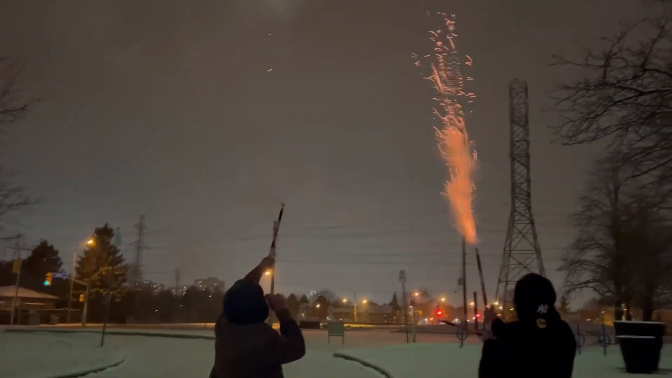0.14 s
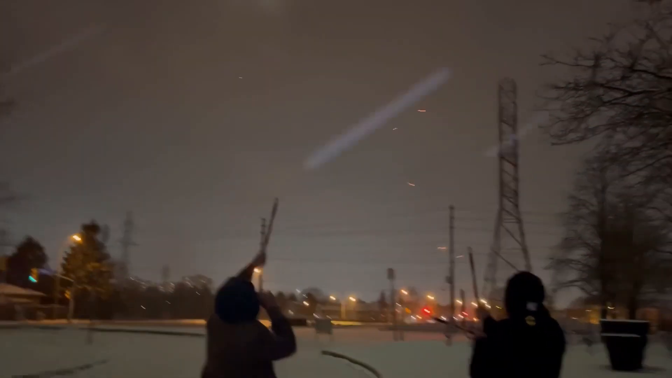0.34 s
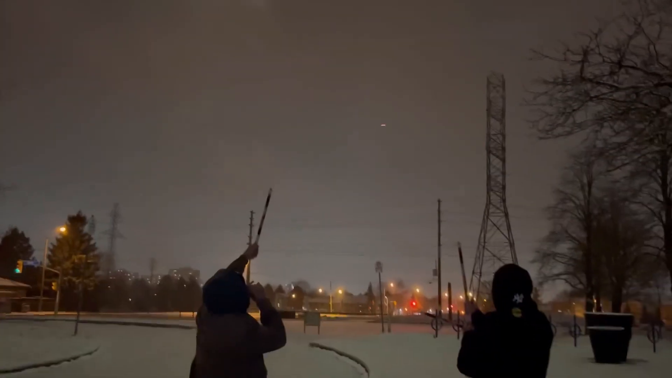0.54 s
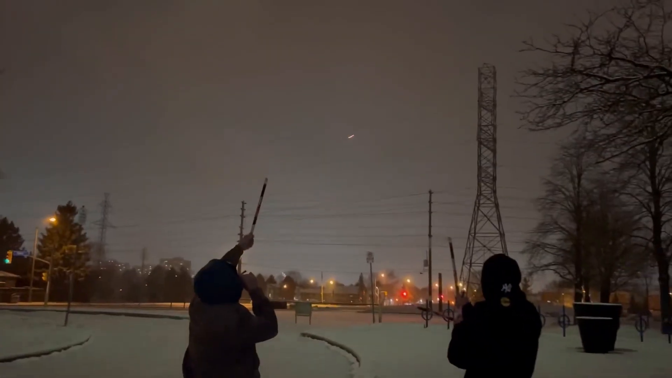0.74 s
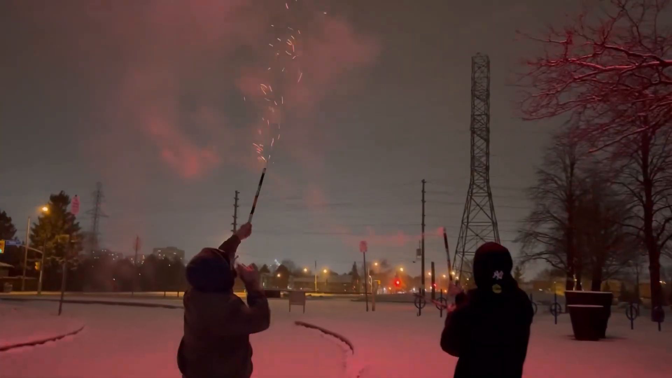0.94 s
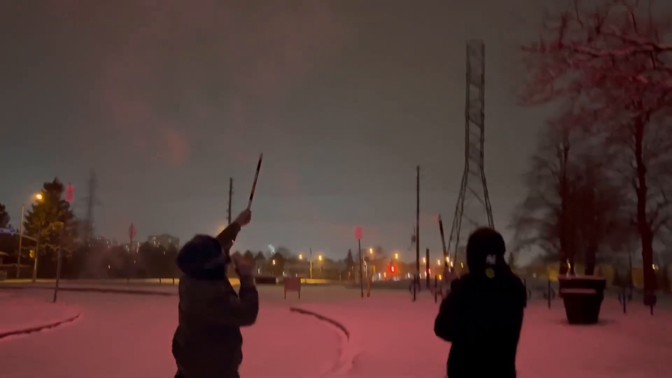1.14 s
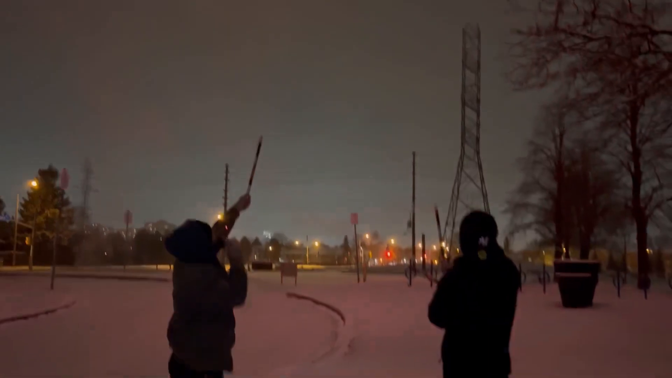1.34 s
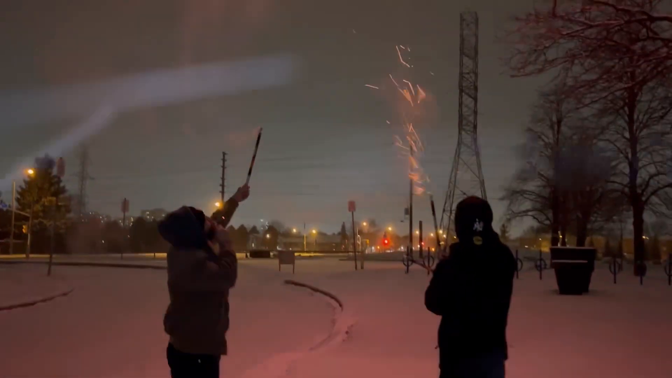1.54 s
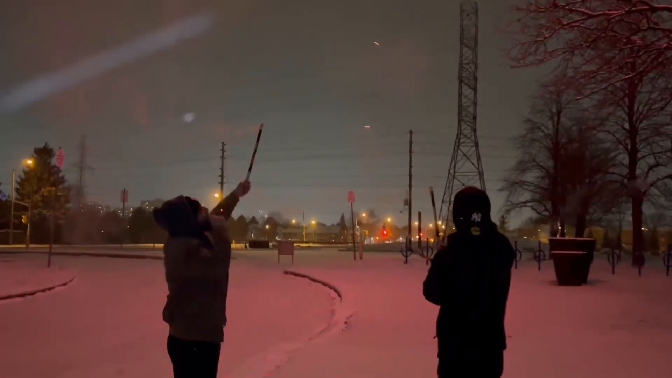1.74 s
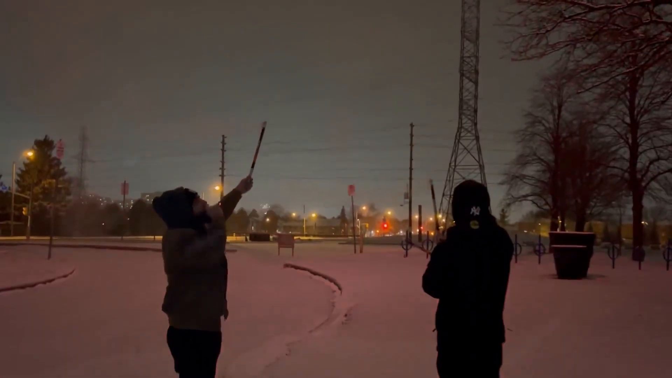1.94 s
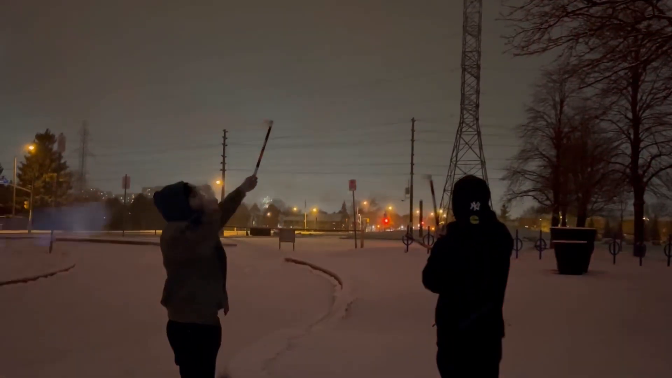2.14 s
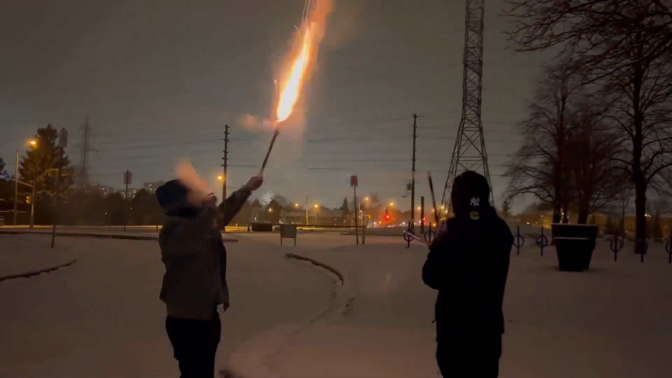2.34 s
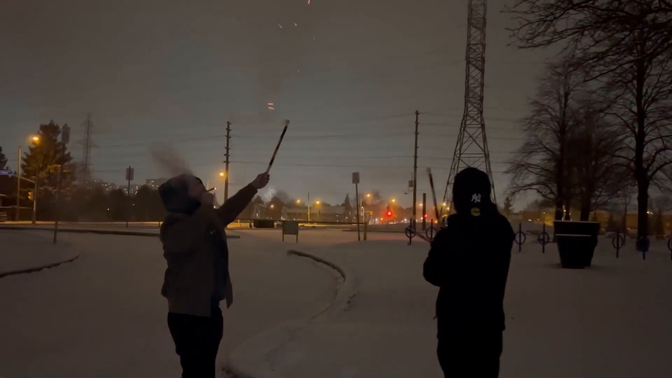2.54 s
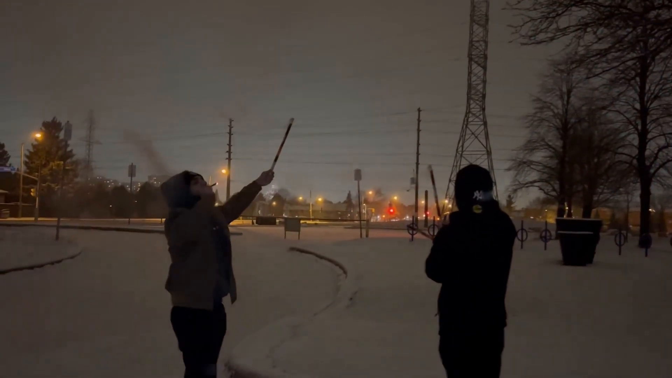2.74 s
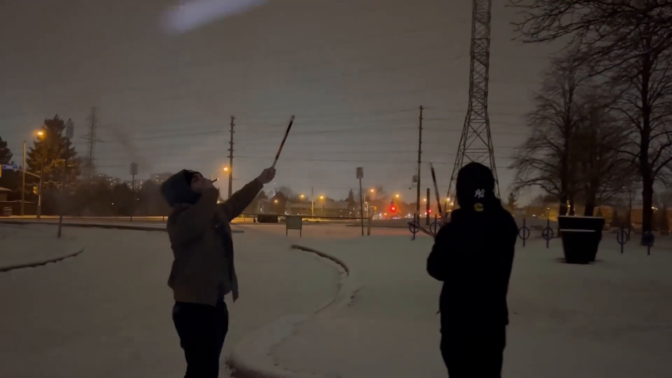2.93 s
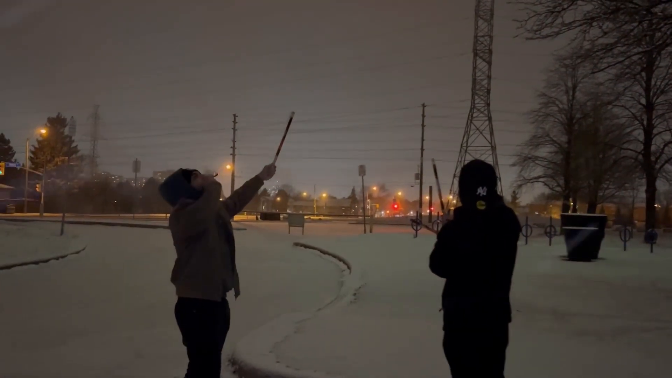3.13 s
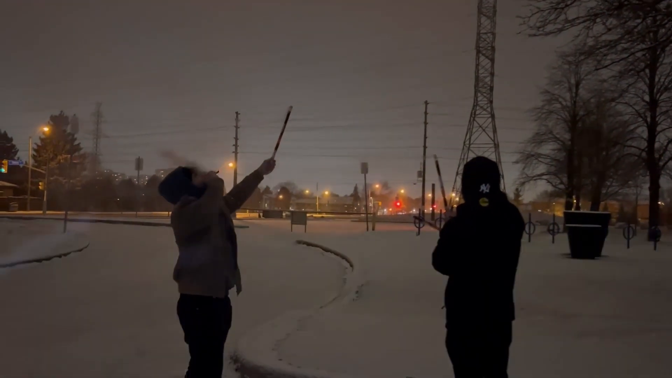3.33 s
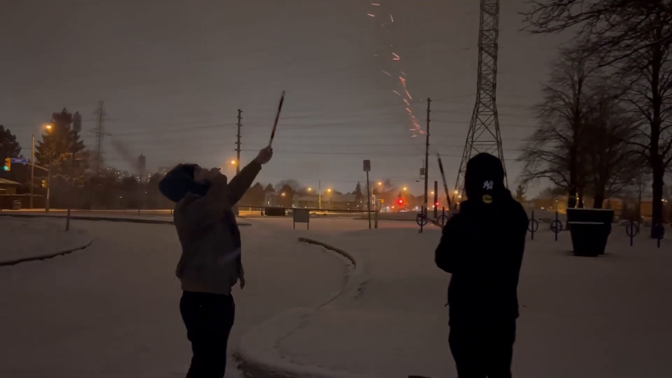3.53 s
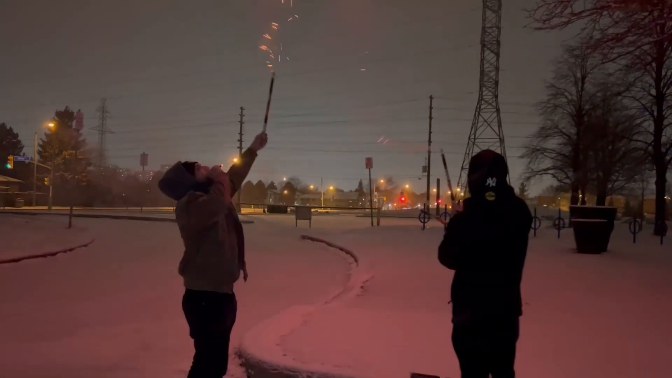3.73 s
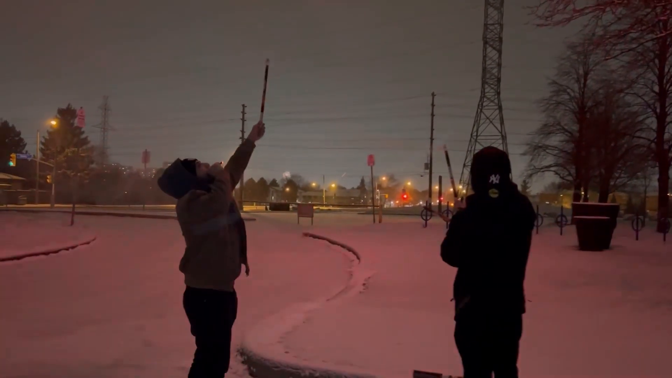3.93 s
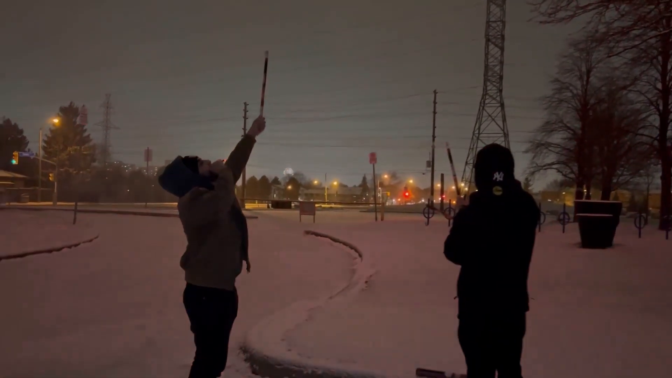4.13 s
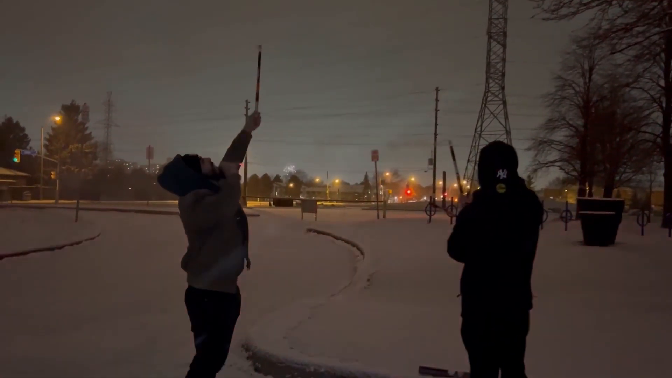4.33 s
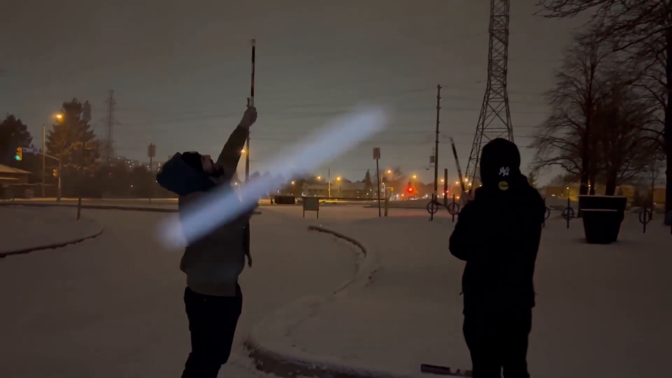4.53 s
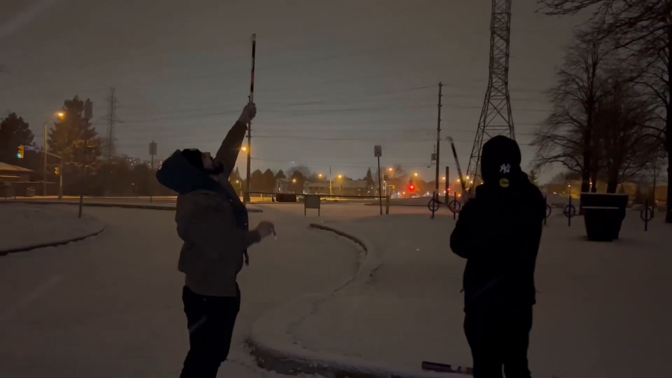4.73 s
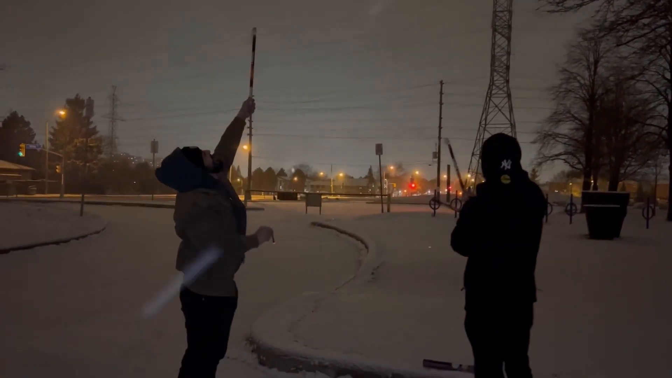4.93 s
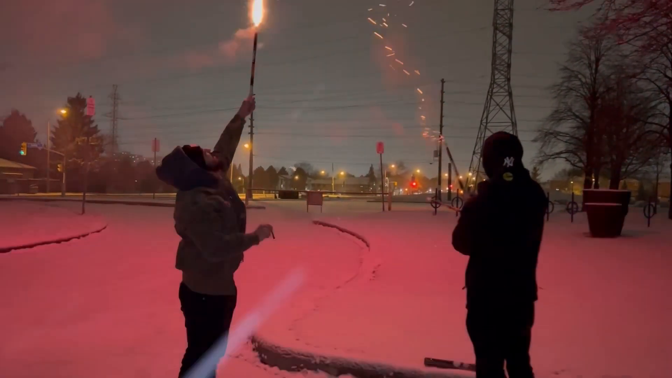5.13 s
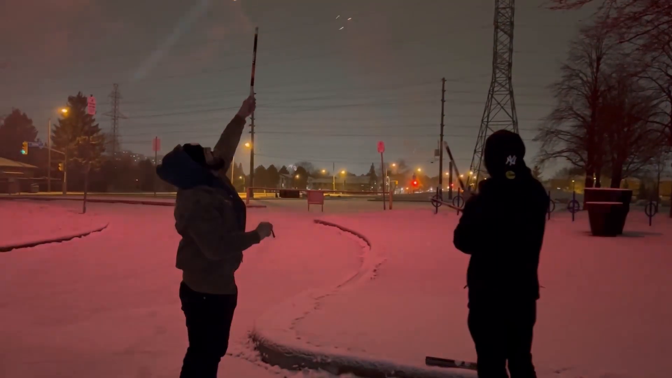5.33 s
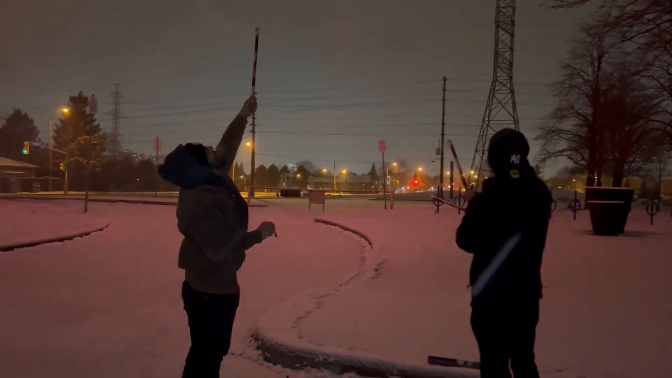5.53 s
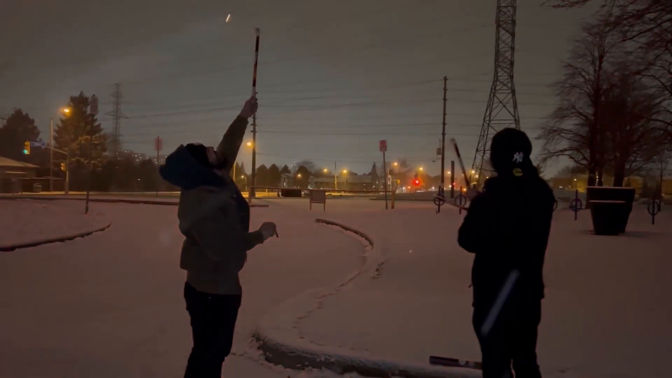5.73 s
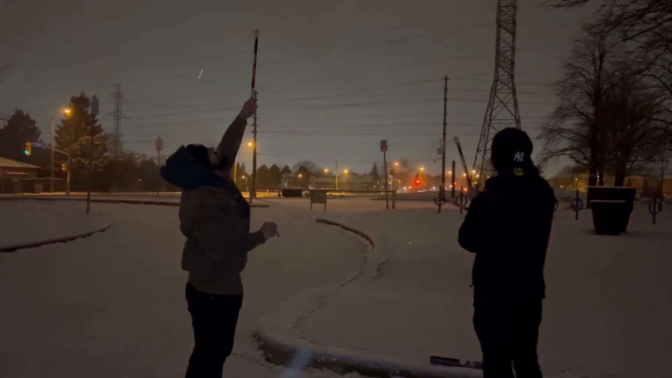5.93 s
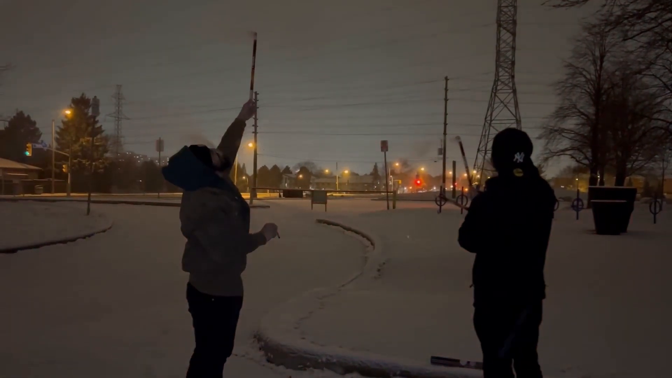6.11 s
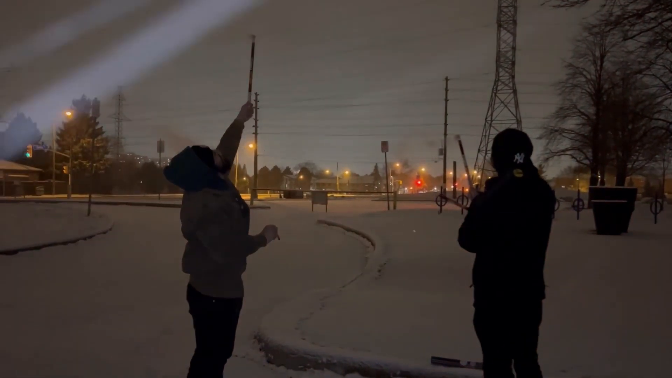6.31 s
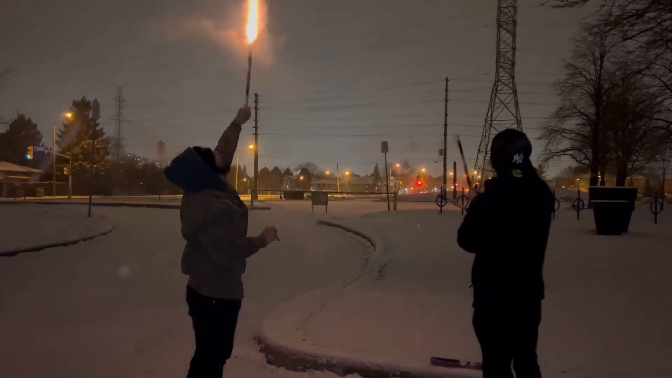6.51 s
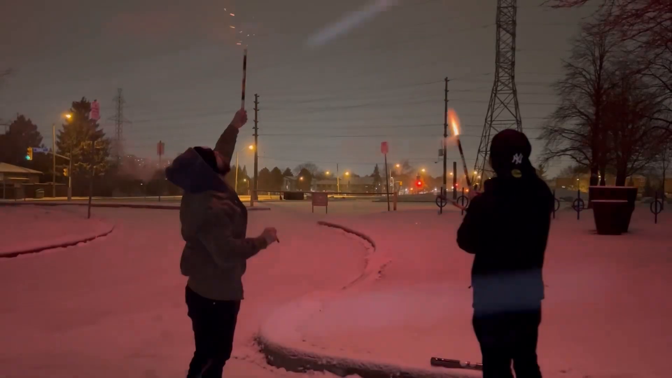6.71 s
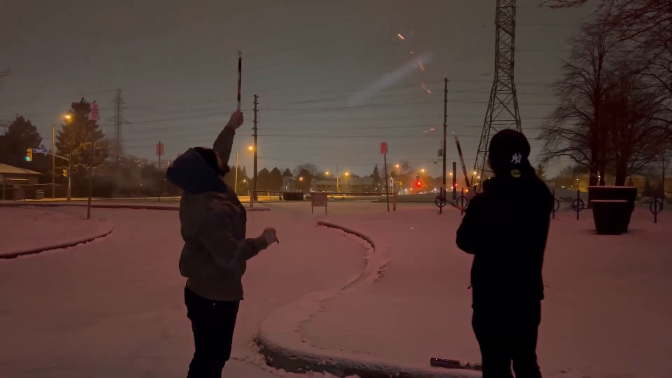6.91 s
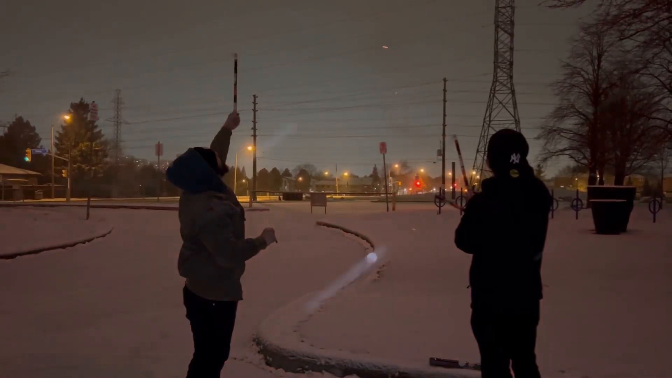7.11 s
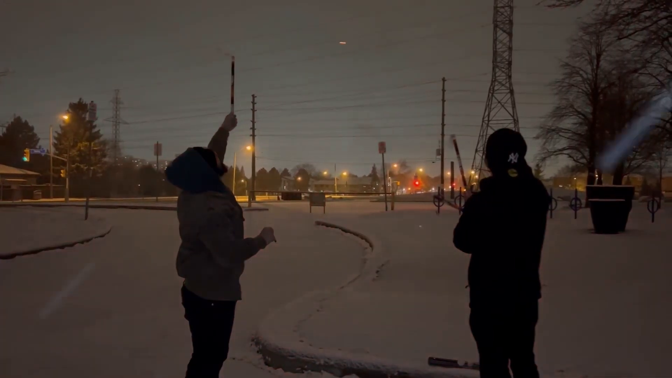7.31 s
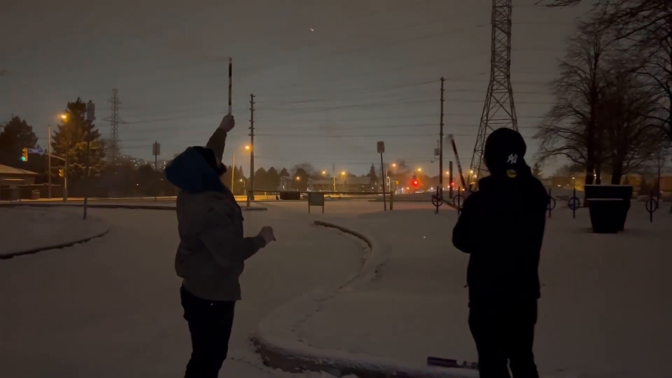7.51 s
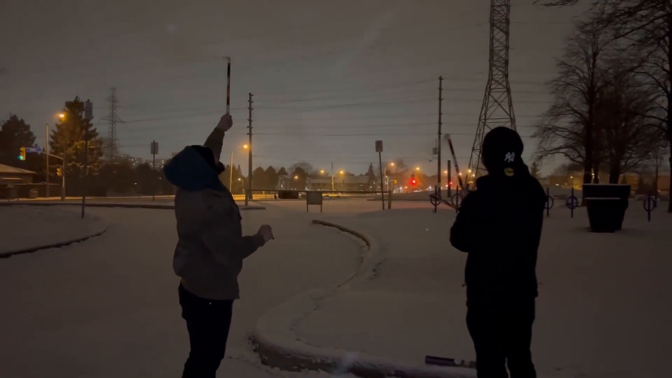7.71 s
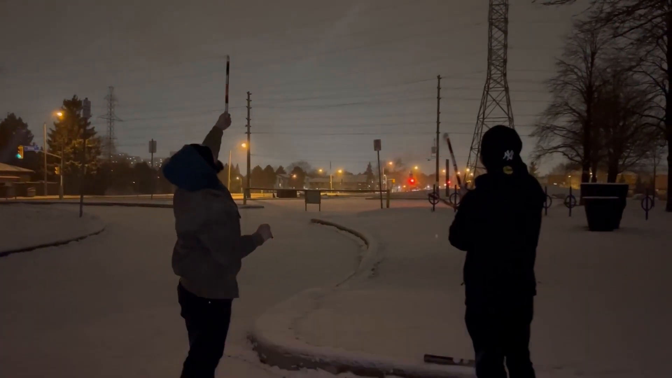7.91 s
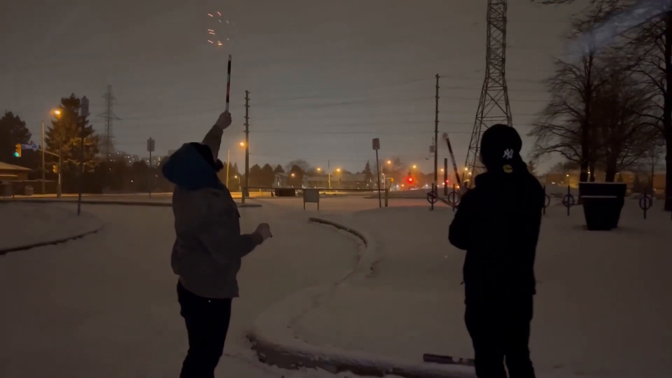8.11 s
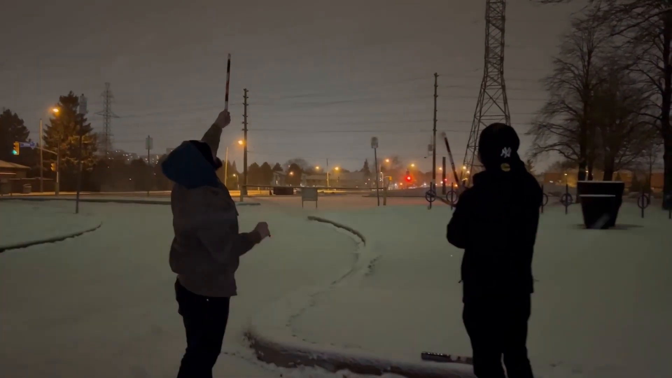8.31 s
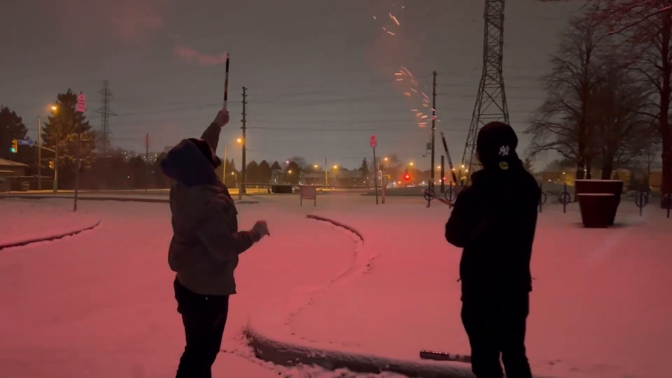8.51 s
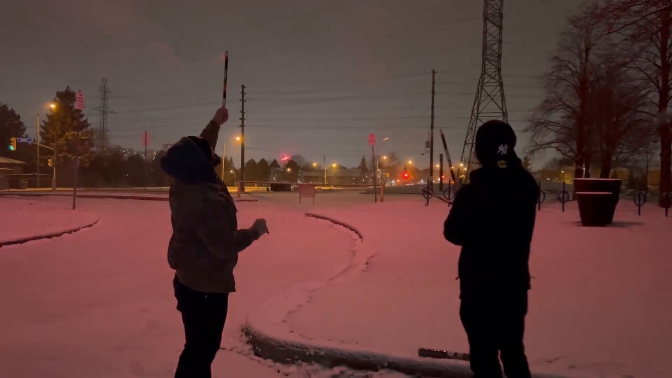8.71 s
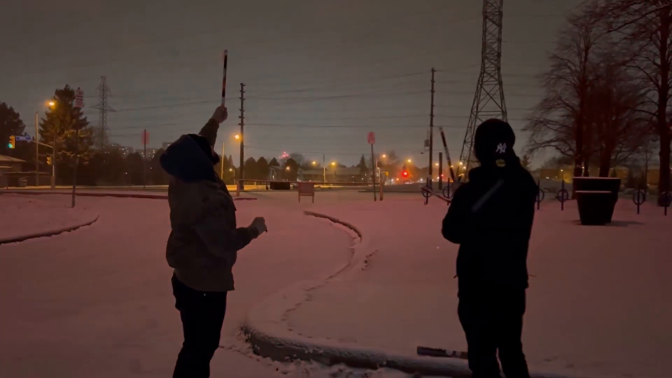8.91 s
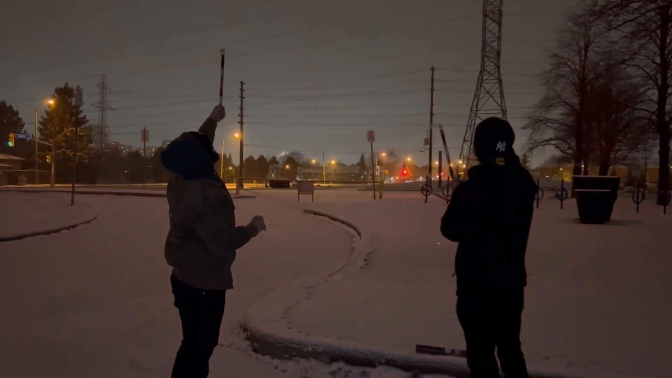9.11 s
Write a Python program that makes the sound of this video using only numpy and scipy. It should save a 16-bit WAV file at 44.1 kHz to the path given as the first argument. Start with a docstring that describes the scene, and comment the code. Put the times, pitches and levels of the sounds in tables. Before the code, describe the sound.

Two handheld firework tubes fire sharp, thumping pops at uneven intervals in a snowy park, with short echoes, distant booms and low wind rumble.

```python
"""Two roman candles fire a few metres away in a snowy park at night: impulsive sources over a reflecting plane.
Each shot sums a crack, a spit of gas, and a thump and bark that interfere with their bounce off the snow.
People nearby, trees and houses return each shot as delayed copies and decaying coloured noise; sparks are
grainy hiss. Far fireworks are pulses partly scattered into noise, with the treble absorbed by the air; small
ticks are brief sine packets. Turbulent noise and dull bumps strike the microphone over town hum and long
rolling tails."""
import sys
import numpy as np
from scipy import signal
from scipy.fft import rfft, irfft, next_fast_len
from scipy.io import wavfile

SR = 44100
rng = np.random.default_rng(int(sys.argv[2]) if len(sys.argv) > 2 else 0)


def master_out(mix):
    """Clip the mix to full scale and print it as 16-bit PCM to the path in sys.argv[1]."""
    frames = np.transpose(np.atleast_2d(mix))
    ceiling = np.clip(frames, -1, 1)
    pcm = np.round(ceiling * 32767).astype(np.int16)
    wavfile.write(sys.argv[1], SR, pcm)


N = 403602  # length of the scene, samples
LEAD = .03  # time kept ahead of each event's zero, s
CLOCK = np.arange(2 * SR) / SR - LEAD  # time since an event, s
HZ = np.fft.rfftfreq(len(CLOCK), 1 / SR)


def amp(db):
    """Definition of level: decibels to amplitude gain."""
    return 10 ** (np.asarray(db) / 20)


def read(points, hz):
    """Logarithmic pitch scale: a table interpolated along log frequency."""
    f, value = np.transpose(points)
    return np.interp(np.log(hz + 1), np.log(f + 1), value)


def at_level(x, db):
    """Energy equivalence: an event scaled to the energy of 10 ms of sound at the given rms level."""
    energy = np.mean(np.sum(x ** 2, axis=-1)) + 1e-20
    return x * amp(db) * np.sqrt(SR / 100 / energy)


def add(mix, s, sound):
    """Superposition: mixes in an event whose zero time falls at s."""
    start = round((s - LEAD) * SR)
    sound = sound[..., max(-start, 0):]
    part = mix[:, max(start, 0):][:, :sound.shape[-1]]
    part += sound[..., :part.shape[1]]


def delayed(s):
    """Fourier shift theorem: a delay of s seconds is a phase linear in frequency."""
    return np.exp(-2j * np.pi * HZ * s)


def pulse(spectrum, paths=1):
    """Impulse response: one pressure pulse of the given spectrum, summed over the given paths."""
    return irfft(amp(read(spectrum, HZ)) * paths * delayed(LEAD))


# Correlation of diffuse sound between the two ports: f/Hz, correlation/1
PORT_CORRELATION = [(60, 0.94), (300, 0.99), (700, 0.84), (1400, 0.67), (3000, 0.18), (7000, 1), (14000, 1)]


def noise(spectrum, size, grain_db=0):
    """Diffuse field: coloured, partly correlated noise of rms 1; with grain, a few arrivals stand out."""
    padded = next_fast_len(size)
    hz = np.fft.rfftfreq(padded, 1 / SR)
    left, right, strength = rng.standard_normal((3, padded))
    grain = amp(grain_db * np.minimum(strength, 3))
    a, b = rfft(np.array([left, right]) * grain)
    same = np.clip(read(PORT_CORRELATION, hz), -1, 1)
    ports = np.array([a, same * a + np.sqrt(1 - same ** 2) * b])
    x = irfft(ports * amp(read(spectrum, hz)), padded)[:, :size]
    return x / x.std()


def burst(rise, fall):
    """Exponential relaxation: an envelope that rises from time zero and dies away."""
    t = np.maximum(CLOCK, 0)
    return (1 - np.exp(-t / rise)) * np.exp(-t / fall)


def flicker(size, span, depth_db):
    """Random amplitude modulation: a gain that takes a new random value every span seconds."""
    knots = rng.standard_normal(size // 16)
    return amp(depth_db * np.interp(np.arange(size) / SR / span, np.arange(len(knots)), knots))


def dying(x, t60):
    """Reverberant decay: each band of x falls by 60 dB in its own time."""
    hz, t, z = signal.stft(x, SR, nperseg=512)
    z = z * amp(-60 * np.maximum(t - LEAD, 0) / read(t60, hz)[:, None])
    return signal.istft(z, SR, nperseg=512)[1][:, :len(CLOCK)]


# Distinct repeats, first from the people nearby, then from hard surfaces: t/s after the shot, level/dB, best
# returned f/Hz
SLAPS = [(0.016, -12, 458), (0.0496, -22.5, 1489), (0.111, -19, 2400)]


def slapped(x):
    """Specular reflection: the sound and its delayed copies, each narrowed to one broad band."""
    paths = 1
    for s, db, hz in SLAPS:
        resonance = 1 + 1j * (HZ / hz - hz / (HZ + 1))
        paths = paths + amp(db) * delayed(s) / resonance
    return irfft(rfft(x) * paths)


# Shots: t/s, snow bounce delay t/s, crack level/dB, bark level/dB, bark tilt/(dB per octave),
# thump level/dB, gas level/dB, echo level/dB; levels in the sense of at_level, before slaps and microphone
SHOTS = [(-.32, 0.0037, -19.5, -26, -7.5, -14, -24, -24.5), (0.114, 0.0035, -23, -19, 0.5, -18.5, -27, -28),
         (0.8451, 0.0048, -24.5, -19.5, -1.5, -19.5, -21, -25.5),
         (1.4717, 0.004, -25, -15.5, 2, -15, -22, -26), (2.3583, 0.0041, -20, -17, -1.3, -15, -17, -25.5),
         (3.3816, 0.0035, -23, -21.5, -0.5, -12.5, -27.5, -23),
         (3.6076, 0.0039, -12.5, -16.5, -0.1, -17, -14.5, -26),
         (4.977, 0.004, -18.5, -13, -1.5, -14, -23, -24.5), (5.1436, .0031, -22, -18, 0.5, -20.5, -23, -27),
         (6.54, .0044, -24, -15, -0.6, -17, -16.5, -26), (6.748, 0.0033, -23, -29, -2, -12.5, -29.5, -24),
         (7.9486, 0.004, -25, -23, -0.5, -17.5, -22.5, -23.5),
         (8.3791, 0.0037, -24, -22.5, 0, -15.5, -32, -26)]
# Spectra of the parts of a shot, in relative level: f/Hz, level/dB
THUMP_SPECTRUM = [(15, -40), (30, -13.5), (50, -2.5), (70, 5), (105, 3), (170, -3), (250, -17),
                  (400, -22.5), (900, -50.5), (4000, -100)]
BARK_SPECTRUM = [(120, -34.5), (250, 0.5), (350, -2.5), (800, 2.5), (1400, -5), (2150, -5), (2700, -19),
                 (5000, -27.5), (12000, -42)]
CRACK_SPECTRUM = [(300, -28.5), (1300, 1), (2200, 0), (3500, -5.5), (5000, -2.5), (6500, 2), (9000, -1.5),
                  (13000, -4), (16500, -15)]
GAS_SPECTRUM = [(300, 2), (1200, 5), (2200, -0.5), (3500, 2.5), (5000, 0), (6500, -3), (9000, -10),
                (13000, -10), (16500, -12)]


def blast(delay, crack_db, bark_db, tilt_db, thump_db, gas_db, direct_thump=0.43, direct_bark=0.095,
          direct_outflow=0.33, ragged_db=-2, halo_db=-32, halo_rise=.006):
    """Two-path interference: a charge lifts a star; thump and bark also bounce off snow, the crack does not."""
    bounce = delayed(delay)  # of gain 1; the direct gains are relative to it
    thump = at_level(pulse(THUMP_SPECTRUM, direct_thump + bounce), thump_db)
    # ragged outflow colours every bark differently
    outflow = noise(BARK_SPECTRUM, len(CLOCK)) * burst(0.00023, 0.0029)
    ragged = at_level(irfft(rfft(outflow) * (direct_outflow + bounce)), ragged_db)
    bark = at_level(pulse(BARK_SPECTRUM, direct_bark + bounce), 0) + ragged
    tilt = amp(tilt_db * np.log2(HZ + 1))
    bark = at_level(irfft(rfft(bark) * tilt), bark_db)
    crack = at_level(pulse(CRACK_SPECTRUM), crack_db)
    # gas spits out for a few milliseconds
    gas_noise = noise(GAS_SPECTRUM, len(CLOCK))
    cutoff = 1 + (abs(CLOCK) / 0.0077) ** 6
    gas = at_level(gas_noise * burst(0.00024, .02) / cutoff, gas_db)
    # a faint halo of noise around the crack, from the recorder's processing
    halo = at_level(gas_noise * np.exp(-(CLOCK / halo_rise) ** 2 / 2), halo_db)
    return thump + halo + slapped(bark + crack + gas)


# Clumps of echoes from trees and houses: t/s after the shot, spread t/s, relative level/dB
REFLECTORS = [(.018, 0.0045, -1), (0.037, 0.013, 0.5), (.053, 0.0042, 4), (.066, 0.0066, -4),
              (0.088, 0.0051, -1), (0.115, .002, 5), (.126, 0.018, -5.5), (.195, .02, -15)]
# Spectrum of the echoes, in relative level: f/Hz, level/dB
ECHO_SPECTRUM = [(40, -2), (150, 14.5), (400, 3.5), (900, -2.5), (2200, -2), (3500, -2), (5000, -3),
                 (6500, -5.5), (9000, -8.5), (13500, -13.5), (15000, -25)]
# Reverberation times of the park and of the streets beyond: f/Hz, 60 dB decay t/s
PARK_T60 = [(100, 0.33), (800, 0.36), (3000, 1), (8000, 0.21), (14000, .42)]
STREETS_T60 = [(100, 2.8), (600, 2.2), (2500, 2.88), (5000, 1.8), (9000, 1.3), (14000, 0.38)]


def echoes(delay, db, scatter_db=-1, streets_db=-9, grain_db=8, uneven_db=1.5, bounce_gain=0.44, ragged_db=-1):
    """Multiple scattering: clumps of reflections over the scatter of the park, then a long faint roll."""
    clumps = 0  # power against time
    for s, spread, level in REFLECTORS:
        clumps = clumps + amp(level) ** 2 * np.exp(-.5 * ((CLOCK - s) / spread) ** 2)
    clumped = noise(ECHO_SPECTRUM, len(CLOCK), grain_db) * np.sqrt(clumps)
    scatter = dying(noise(ECHO_SPECTRUM, len(CLOCK), grain_db), PARK_T60) * burst(.014, 10)
    park = (clumped + amp(scatter_db) * scatter) * (CLOCK > 0)
    # near echoes share this shot's bounce delay and one random outflow, so they have one hollow colour
    outflow = rfft(rng.standard_normal(len(CLOCK)) * np.exp(-(CLOCK + LEAD) / .002))
    colour = 1 + bounce_gain * delayed(delay) + amp(ragged_db) * outflow / outflow.std()
    park = irfft(rfft(park) * colour)
    streets = dying(noise(ECHO_SPECTRUM, len(CLOCK), grain_db), STREETS_T60) * burst(.045, 10)
    both = at_level(park, 0) + at_level(streets, streets_db)
    return at_level(both * flicker(len(CLOCK), 0.0054, uneven_db), db)


# Sparks as the fuse burns through to a charge and as a star climbs:
# t/s at the swell's peak, level/dB there before flutter, swell t/s
SPUTTERS = [(.84, -37, 0.0043), (1.1, -50.5, 0.053), (3.94, -56, 0.068), (5.137, -33.5, 0.0091),
            (5.38, -53, 0.14), (6.742, -37, 0.0063)]
# Spectrum of the sparks, in relative level: f/Hz, level/dB
SPUTTER_SPECTRUM = [(800, -24), (2200, 3.5), (3500, 1.5), (5000, -3), (7000, -14.5), (14000, -21)]


def sputter(s, db, swell, grain_db=8, flutter_db=2.5, flutter_span=.005):
    """Random impulsive emission: burning powder sheds sparks, a grainy hiss that swells and fades."""
    t = np.arange(N) / SR
    envelope = amp(db) * np.exp(-((t - s) / swell) ** 2)
    return noise(SPUTTER_SPECTRUM, N, grain_db) * envelope * flicker(N, flutter_span, flutter_db)


# Tiny ticks close by: t/s, level/dB, f/Hz
TICKS = [(4.443, -51, 4700), (4.765, -57.5, 2500), (7.7, -52.5, 3800)]


def tick(db, hz, length=0.00033):
    """Time-frequency packet: a few cycles of a tiny impact under a Gaussian envelope."""
    return at_level(np.exp(-(CLOCK / length) ** 2) * np.sin(2 * np.pi * hz * CLOCK), db)


# Distant fireworks: t/s, boom level/dB, snap level/dB (both before roll and air loss), scattered share/1
FAR_POPS = [(.476, -41.5, -51, 0.76), (2.084, -51.5, -65, 0.53), (2.5427, -29.5, -55.5, 0.12),
            (2.893, -37, -44, 0.63), (4.207, -35.5, -42, 0.52), (4.4304, -27.5, -58, 0.1),
            (4.763, -47, -53, 0.4), (5.460, -34, -39.5, 0.48), (5.661, -35.5, -41.5, 0.53),
            (6.239, -45, -58, 0.56), (6.278, -30.5, -41.5, 0.37), (7.424, -33, -43.5, 0.45),
            (8.659, -35.5, -43, 0.66)]
# Spectra of the distant boom and snap, in relative level: f/Hz, level/dB
BOOM_SPECTRUM = [(30, -22.5), (80, -3), (200, 5), (450, 3.5), (800, -3.5), (1200, -27), (3000, -55),
                 (8000, -95.5)]
SNAP_SPECTRUM = [(300, -17.5), (800, -2.5), (1300, -1), (2100, -10.5), (2900, -18.5), (6000, -51),
                 (10000, -80)]


def far_pop(boom_db, snap_db, scattered, smear=0.014, roll=0.14, roll_db=-9, grain_db=12, thump_db=-3,
            uneven_db=4.0, air_hz=2600):
    """Scattering and absorption: a far pulse, broken into knocks by houses and trees, rolls away."""
    scattered = np.clip(scattered, 0, 1)
    # bass thump, strong only for a pop in clear sight
    out = (1 - scattered) ** 6 * at_level(pulse(THUMP_SPECTRUM), boom_db + thump_db)
    rolling = burst(0.0091, roll) * flicker(len(CLOCK), 0.016, uneven_db)
    for spectrum, db in ((BOOM_SPECTRUM, boom_db), (SNAP_SPECTRUM, snap_db)):
        knocks = noise(spectrum, len(CLOCK), grain_db) * burst(0.0048, smear)
        out = out + np.sqrt(1 - scattered) * at_level(pulse(spectrum), db)
        out = out + np.sqrt(scattered) * at_level(knocks, db)
        out = out + at_level(noise(spectrum, len(CLOCK)) * rolling, db + roll_db)
    # the long way through the air takes the treble
    return irfft(rfft(out) / np.sqrt(1 + (HZ / air_hz) ** 8))


# Dull bumps of air on the microphone: t/s, level/dB
BUMPS = [(0.31, -24.5), (1.072, -20), (2.288, -38.5), (3.171, -32.5), (3.963, -33.5), (5.716, -35),
         (7.752, -36), (8.25, -37)]
# Spectrum of bumps and wind, in relative level: f/Hz, level/dB
RUMBLE_SPECTRUM = [(12, -31.5), (28, -8.5), (50, 2), (70, 3.5), (105, -1.5), (170, -13.5), (280, -26),
                   (600, -43.5), (2000, -68.5), (8000, -100)]


def bump(db):
    """Pressure impulse: a single low pulse of air on the microphone."""
    return at_level(pulse(RUMBLE_SPECTRUM), db)


# Gusts on the microphone: t/s at the peak, level/dB added there before lumps, length t/s before its shares
GUSTS = [(.5, -34.5, 0.12), (.78, -34.5, 0.14), (1.175, -31.5, 0.35), (2.497, -36, 0.089),
         (2.916, -42, 0.084), (3.53, -37.5, 0.19), (5.15, -49.5, .25), (6.408, -40, .25),
         (6.86, -37.5, 0.27), (7.9, -39.5, .14), (8.202, -45, 0.28)]
BREEZE_DB = -49  # the rumble between gusts, before lumps
GUST_RISE, GUST_FALL = 0.48, 0.74  # shares of its length over which a gust builds and eases


def wind(lumps_db=1.96, lump_span=.068):
    """Turbulent pressure: lumpy low noise of a light breeze, and gusts that build faster than they ease."""
    t = np.arange(N) / SR
    power = amp(BREEZE_DB) ** 2
    for s, db, length in GUSTS:
        width = length * np.where(t < s, GUST_RISE, GUST_FALL)
        power = power + amp(db) ** 2 * np.exp(-((t - s) / width) ** 2)
    return noise(RUMBLE_SPECTRUM, N) * np.sqrt(power) * flicker(N, lump_span, lumps_db)


# Spectrum of the hum and rolls, in relative level: f/Hz, level/dB
HUM_SPECTRUM = [(30, -8), (100, 0), (200, -0.5), (400, -11), (800, -14.5), (2000, -23), (4000, -28.5),
                (8000, -36.5), (13500, -39.5), (15000, -59.5)]
# Course of the hum and rolls: t/s, level/dB
HUM_LEVEL = [(0, -52.5), (2.199, -58.5), (3.2, -55.5), (4.1, -55), (4.7, -54), (5.6, -50.5), (6.2, -56),
             (7, -55.5), (7.8, -59.5), (9.15, -62)]


def hum_and_rolls():
    """Incoherent summation: steady town hum together with the long rolling tails of shots and far booms."""
    level_db = np.interp(np.arange(N) / SR, *np.transpose(HUM_LEVEL))
    return noise(HUM_SPECTRUM, N) * amp(level_db)


def scene():
    """Linear superposition: all events over the wind, the hum and the rolls."""
    mix = wind() + hum_and_rolls()
    for s, delay, *charge, echo_db in SHOTS:
        add(mix, s, blast(delay, *charge) + echoes(delay, echo_db))
    for row in SPUTTERS:
        mix += sputter(*row)
    for s, db, hz in TICKS:
        add(mix, s, tick(db, hz))
    for s, *pop in FAR_POPS:
        add(mix, s, far_pop(*pop))
    for s, db in BUMPS:
        add(mix, s, bump(db))
    return mix


# Phase by which the left port leads the right: f/Hz, phase/rad
PORT_PHASE = [(60, 0), (300, -.25), (600, -.7), (1300, -.7), (2100, .3), (2700, 2), (3900, .8), (5000, 1.2),
              (6000, 3.1), (8000, 6.3), (10300, 9.4), (12500, 12.6), (15000, 15.7)]
# Level of the left port over the right: f/Hz, level/dB
PORT_BALANCE = [(100, -0.5), (250, 1), (500, 0), (1000, -0.5), (2200, -0.5), (4000, -2.6), (8000, 0),
                (14000, 0.5)]
# Group delay of the microphone: f/Hz, lag t/s
BASS_LAG = [(20, 0.018), (60, .019), (100, .0145), (160, .0118), (250, .0075), (500, 0.0032),
            (1000, 0.0011), (2500, 0.00056)]
# Resonances of the microphone: f/Hz, width f/Hz, lift level/dB
MIC_MODES = [(1450, 200, 0), (2120, 88, 1.5), (5090, 310, 3.5), (7060, 330, 0.5), (13900, 400, 1)]
EDGE_HZ = 16900  # upper band limit


def record(dry):
    """Dispersion: the microphone delays bass, so pops chirp downward; two ports, soft overload, band limit."""
    size = next_fast_len(N + SR)
    hz = np.fft.rfftfreq(size, 1 / SR)
    # phase is the integral of group delay over frequency
    lag = 2 * np.pi * np.cumsum(read(BASS_LAG, hz)) * hz[1]
    side = np.array([[.5], [-.5]])  # half of each difference to either port
    colour_db = sum(db / (1 + (2 * (hz - f) / width) ** 2) for f, width, db in MIC_MODES)
    gain = amp(colour_db + side * read(PORT_BALANCE, hz))
    response = gain * np.exp(1j * (side * read(PORT_PHASE, hz) - lag))
    heard = np.tanh(irfft(rfft(dry, size) * response, size)[:, :N])
    lowpass = signal.firwin(511, EDGE_HZ, window=("kaiser", 9), fs=SR)
    return signal.oaconvolve(heard, lowpass[None], "same")


dry = scene()
out = record(dry)
master_out(out)
```